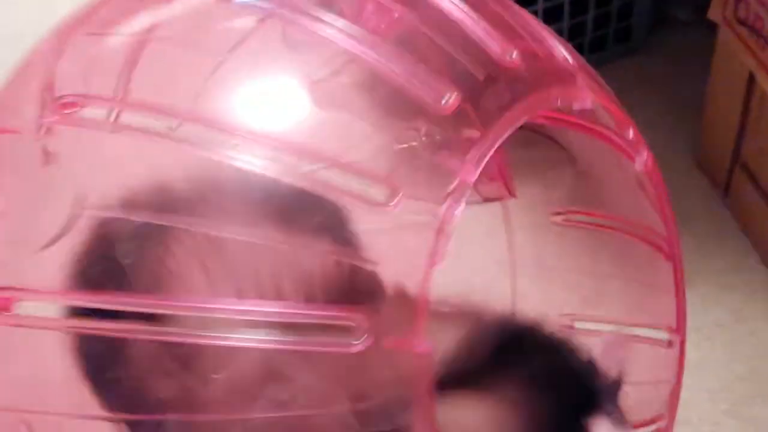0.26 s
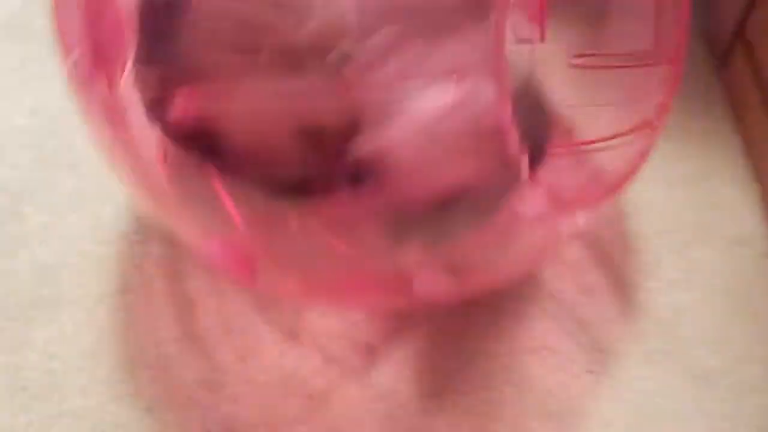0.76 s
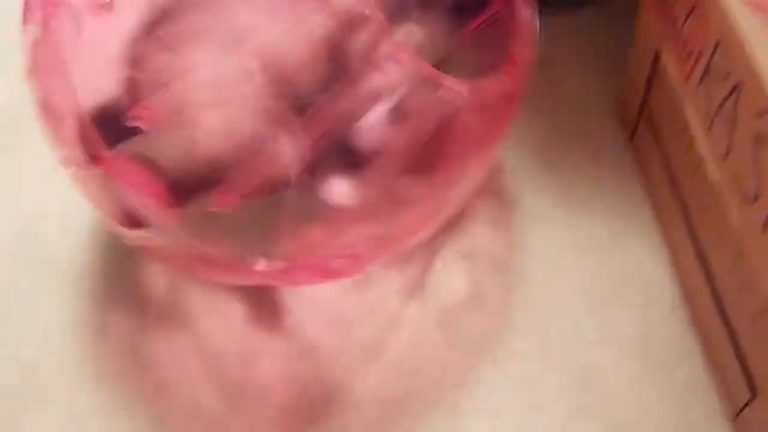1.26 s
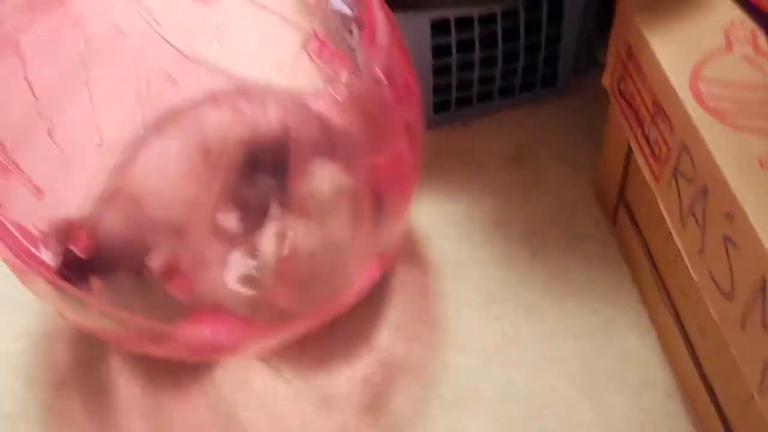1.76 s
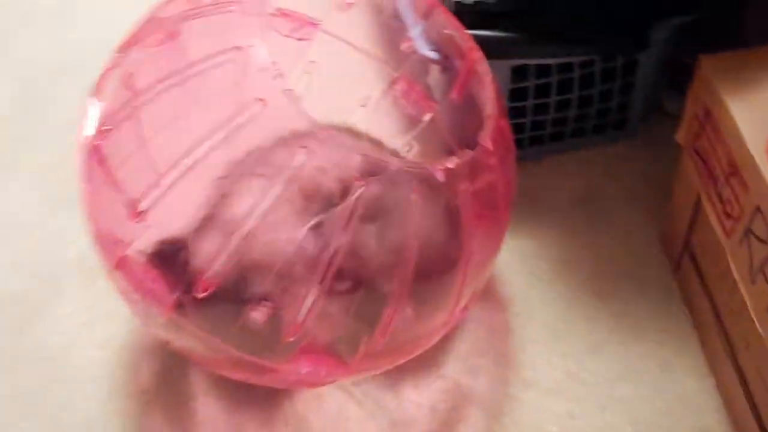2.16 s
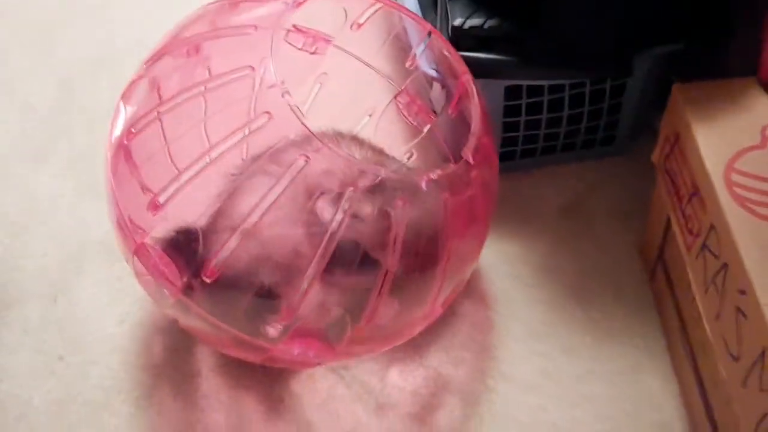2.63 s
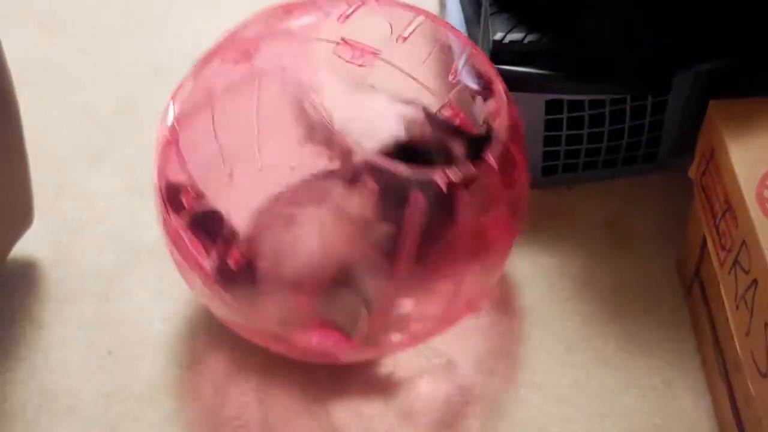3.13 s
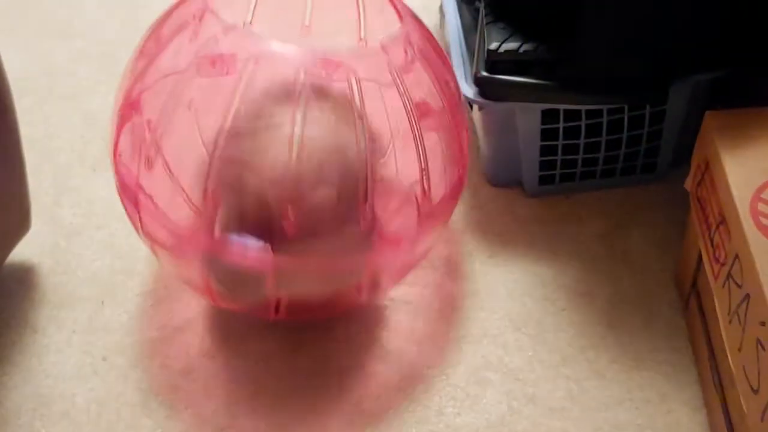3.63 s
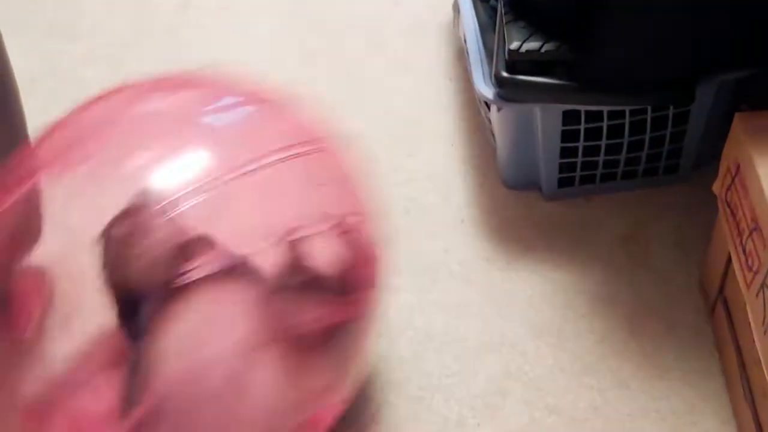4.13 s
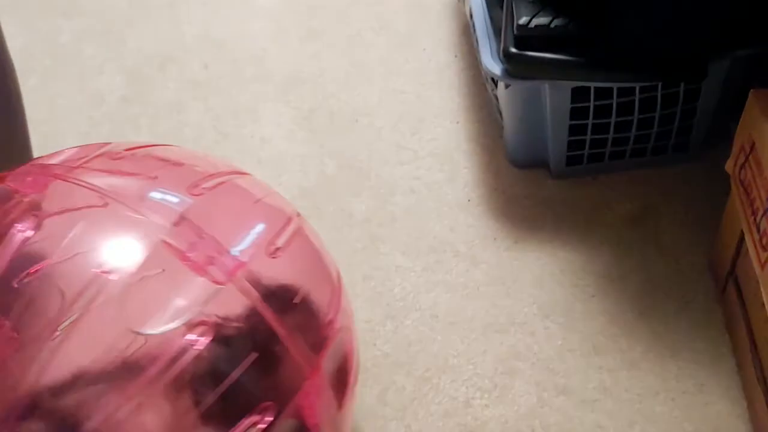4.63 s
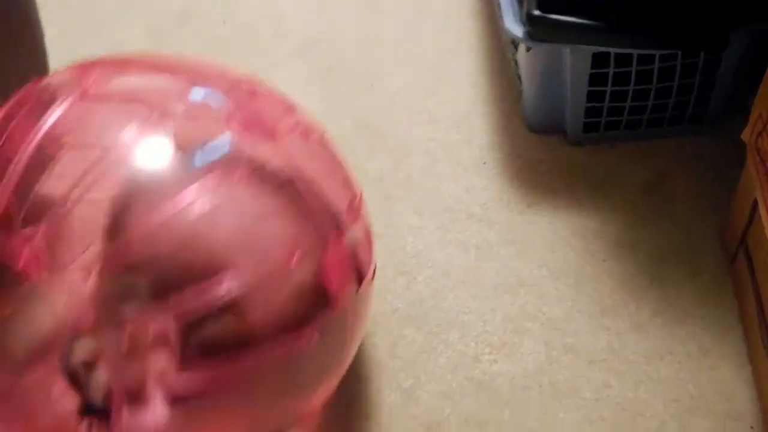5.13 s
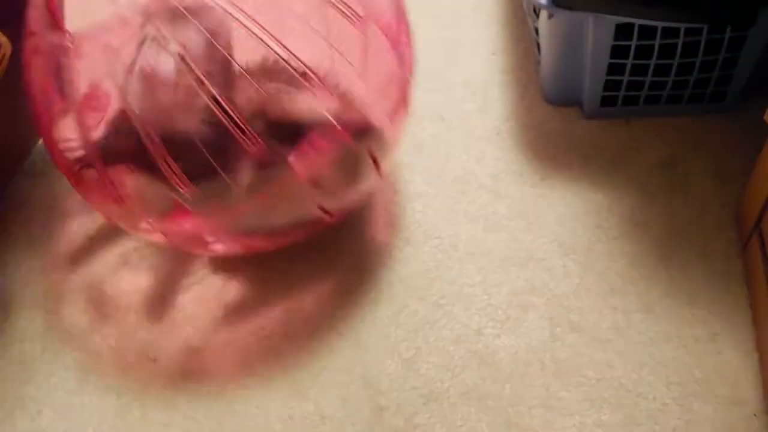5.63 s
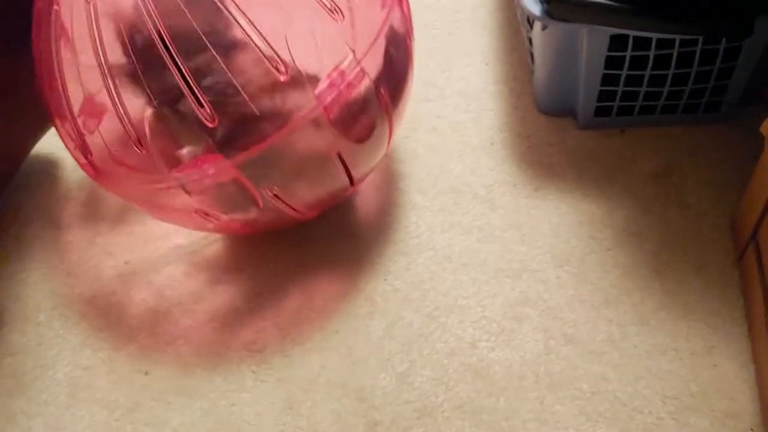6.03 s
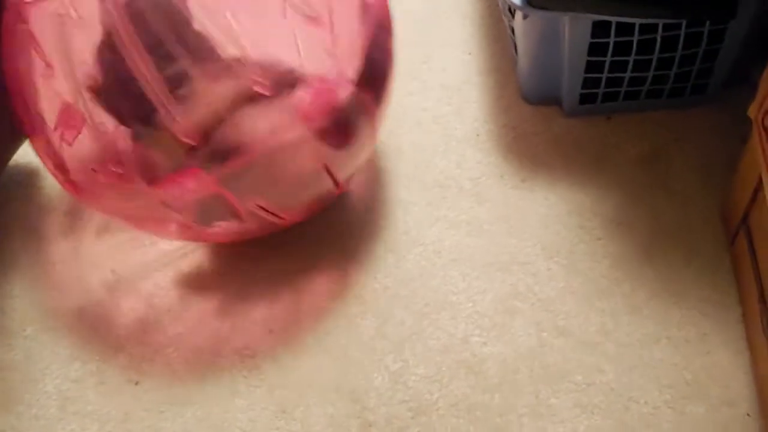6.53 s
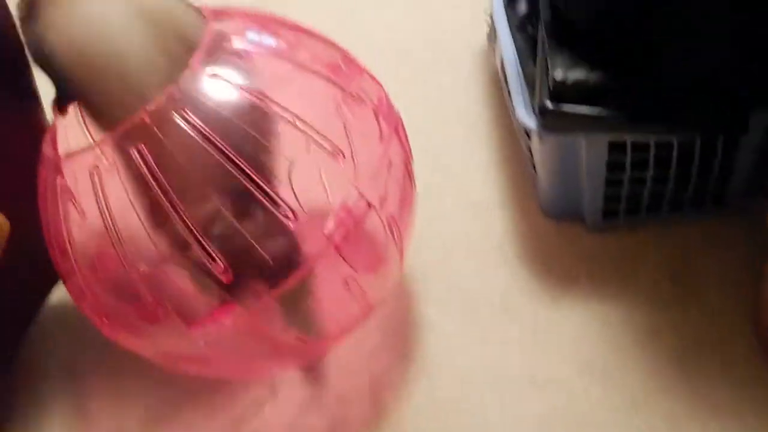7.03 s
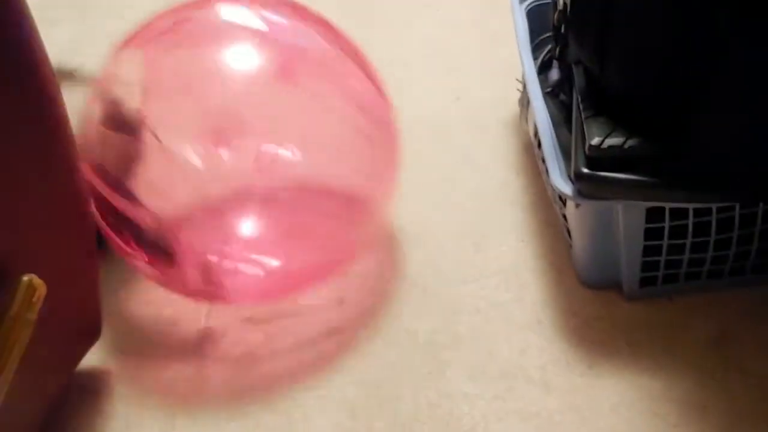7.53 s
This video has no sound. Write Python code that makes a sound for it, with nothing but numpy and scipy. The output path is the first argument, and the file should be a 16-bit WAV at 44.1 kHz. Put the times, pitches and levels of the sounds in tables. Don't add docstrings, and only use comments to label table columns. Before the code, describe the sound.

A small animal scrabbles inside a hollow plastic ball on carpet, heard close on a phone in a small furnished room. Claw ticks and scrapes come in quick runs, then a hard knock just after one second. A quieter stretch holds rustling and a faint sniff; an even heavier clatter lands past four seconds. More scratching, a tiny squeak and scattered knocks follow, over low fan hum.

```python
import sys
import numpy as np
from scipy import signal
from scipy.fft import rfft, irfft, next_fast_len
from scipy.io import wavfile
from scipy.ndimage import uniform_filter1d

SR = 44100
rng = np.random.default_rng(int(sys.argv[2]) if len(sys.argv) > 2 else 0)


def transcribe(signal):
    frames = np.atleast_2d(signal).T
    limited = np.clip(frames, -1, 1)
    pcm = np.round(limited * 32767).astype(np.int16)
    wavfile.write(sys.argv[1], SR, pcm)


def rack_gain(trim_db):
    fader = np.asarray(trim_db, float)
    return 10 ** (fader / 20)


N = 342965


def noise():
    return rng.standard_normal(N)


def unit(x):
    return x / np.sqrt(np.mean(x ** 2))


def band(x, lo_hz, hi_hz, order=2):
    return signal.sosfilt(signal.butter(order, [lo_hz, hi_hz], "band", fs=SR, output="sos"), x)


def walk(rate):
    hold = int(SR / rate)
    levels = np.repeat(rng.standard_normal(N // hold + 1), hold)
    return 1.514 * uniform_filter1d(uniform_filter1d(levels, hold), hold)[:N]


def curve(table):
    s, value = np.transpose(table)
    return np.interp(np.arange(N) / SR, s, value)


def add(out, x, s):
    i = int(s * SR)
    out[i:i + len(x)] += x[:N - i]


def decay(t, t60):
    return np.exp(-np.log(1000) * t / t60)


def ring(push, hz, gain, t60):
    t = np.arange(len(push)) / SR
    waves = np.sin(2 * np.pi * hz[:, None] * t) * decay(t, t60[:, None])
    y = signal.fftconvolve(push, (gain / np.sqrt(t60)) @ waves)[:len(push)]
    return y / np.abs(y).max()


def crowd(response, count):
    hz, db = np.transpose(response)
    place = (np.arange(count) + rng.random(count)) / count
    spread = hz[0] + (hz[-1] - hz[0]) * place
    return spread, rack_gain(np.interp(spread, hz, db)) * (-1) ** np.arange(count)


def room_hiss():
    # frequency in Hz, level in dB per Hz.
    room = [(15, -46.5), (25, -21), (64, -8.5), (133, -7.5), (162, -13), (232, -12.5), (262, -9.5),
            (360, -12), (426, -17), (726, -20.5), (1430, -24.5), (1700, -21), (2060, -23), (7090, -48.5),
            (8200, -46.5), (10700, -82.5), (18000, -120)]
    f = np.arange(N // 2 + 1) * SR / N + 1e-3
    hz, db = np.transpose(room)
    spectrum = rfft(noise()) * rack_gain(np.interp(np.log(f), np.log(hz), db))
    edges_hz = [0, 110, 220, 440, 880, 1760, 3520, SR]
    hiss = np.zeros(N)
    for lo, hi in zip(edges_hz, edges_hz[1:]):
        hiss += rack_gain(1.95 * walk(5)) * irfft(spectrum * (f >= lo) * (f < hi), N)
    return rack_gain(-46.5) * unit(hiss)


def fan_hum():
    # time in seconds, level in dB.
    hum = [(0, -59), (.5, -58.5), (1.2, -53.5), (1.7, -50), (2.6, -49), (3.0, -46), (3.7, -45.5),
           (4.1, -55.5), (4.5, -55.5), (4.8, -50.5), (5.9, -47), (6.1, -57), (6.55, -54), (6.8, -50.5),
           (7.3, -48.5), (7.78, -51.5)]
    hum_hz = 234.6 + 1.2 * walk(8.1)
    level = np.sqrt(2) * rack_gain(curve(hum) + 1.3 * walk(12))
    return level * np.sin(2 * np.pi * np.cumsum(hum_hz) / SR)


def echo(x):
    t = np.arange(int(.3 * SR)) / SR
    tail = band(rng.standard_normal(len(t)), 180, 3500, order=1) * decay(t, 0.11) * (t > .004)
    return rack_gain(-17.5) * signal.fftconvolve(x, tail / np.sqrt(np.sum(tail ** 2)))[:N]


def rustle():
    # time in seconds, effort in dB.
    effort = [(0, -0.5), (.2, -1), (.7, 2), (.86, -2.5), (1.19, 2.5), (1.5, -2.5), (2.4, 0.5), (2.75, 1.5),
              (3.05, 0.5), (3.6, 3.5), (3.9, 4), (4.3, -1), (5.02, 0), (5.87, 0), (6.11, 3.5), (6.37, 0.5),
              (6.73, 2.5), (7.45, 1)]
    effort_db = curve(effort)
    fur_db, scuff_db = -46.5 + 0.51 * effort_db, -52.5 + effort_db
    fur_floor_db, scuff_floor_db = -50.0, -55
    hit = rng.random(N) < 900 / SR
    hit_db = np.minimum(3 * rng.exponential(size=N), 9)
    grains = noise() * (1 + 0.62 * hit * rack_gain(hit_db)) * rack_gain(1.2 * walk(40))
    fur = band(grains, 740, 4090) + 0.46 * band(grains, 1750, 2370) + 0.65 * band(grains, 925, 1196)
    scuff = band(grains, 2100, 13750) + 0.43 * band(grains, 6480, 6890)

    def above(db, floor_db):
        return np.sqrt(np.maximum(rack_gain(2 * db) - rack_gain(2 * floor_db), 0))

    return above(fur_db, fur_floor_db) * unit(fur) + above(scuff_db, scuff_floor_db) * unit(scuff)


def whistles():
    # start in seconds, length in seconds, centre in Hz, width in Hz, level in dB.
    breaths = [
        (2.978, 0.085, 4040, 530, -42.5),
        (3.115, 0.026, 6950, 600, -49.5),
        (2.982, 0.061, 7100, 900, -47.5),
        (5.971, 0.031, 1180, 100, -29),
        (6.019, 0.016, 1380, 180, -36),
    ]
    out = np.zeros(N)
    for s, length, hz, width_hz, db in breaths:
        k = int(length * SR)
        hiss = band(rng.standard_normal(SR // 4), hz - width_hz / 2, hz + width_hz / 2)[-k:]
        add(out, rack_gain(db) * unit(hiss) * np.sin(np.linspace(0, np.pi, k)), s)
    return out


def rasps():
    # start in seconds, length in seconds, level in dB.
    drags = [(0.149, 0.1, -40.5), (0.603, 0.084, -46), (0.809, .075, -38), (1.034, 0.023, -40.5),
             (2.923, 0.11, -51), (3.205, 0.055, -48), (3.995, 0.026, -40.5), (4.218, 0.085, -44),
             (4.955, 0.093, -46), (5.997, .07, -49), (6.066, 0.144, -38.5), (0.663, 0.13, -57),
             (1.236, 0.048, -39), (4.17, .03, -35), (4.42, 0.057, -47.5), (6.31, 0.11, -41.5)]
    grit = (rng.random(N) < 4000 / SR) * noise() * rack_gain(2.2 * walk(150))
    grit = unit(band(grit, 1700, 5900, order=1) + 0.16 * band(grit, 5800, 7800))
    level = np.zeros(N)
    for s, length, db in drags:
        add(level, rack_gain(db) * np.sin(np.linspace(0, np.pi, int(length * SR))) ** .5, s)
    return grit * level


def bumps():
    # start in seconds, peak in dB, pitch in Hz, 60 dB decay in seconds.
    thuds = [(1.236, -16.5, 81, 0.14), (1.254, -28, 136, 0.098), (4.168, -29, 69.4, 0.12),
             (4.186, -15, 210, 0.054), (4.202, -16.5, 159.4, 0.16), (4.212, -26, 130, 0.08),
             (4.289, -28.5, 127, 0.17), (4.329, -35, 102, 0.32), (3.8, -29, 172, 0.097),
             (4.235, -35, 200, 0.06), (4.35, -31.5, 170, 0.13), (1.262, -32, 70, .1),
             (3.801, -22, 276, 0.091), (4.48, -38, 142, 0.35), (7.735, -35.5, 306, 0.097),
             (7.752, -29.5, 199, 0.13), (0.3, -27, 285, 0.04), (.302, -16, 750, 0.035),
             (.618, -33.5, 836, 0.055), (1.239, -23, 436, 0.076), (1.236, -18.5, 612, 0.044),
             (2.732, -31.5, 287, 0.11), (3.797, -20, 620, 0.047), (4.163, -17, 292, 0.061),
             (4.484, -40, 513, 0.067), (4.720, -23.5, 543, 0.029), (6.808, -23, 275.4, 0.17),
             (7.462, -27.5, 770, 0.03)]
    out, t = np.zeros(N), np.arange(int(.3 * SR)) / SR
    for s, db, hz, t60 in thuds:
        phase = 2 * np.pi * (hz * t + .5 * (1 - np.exp(-t / 0.02)))
        onset = 1 - np.exp(-t * hz / 0.31)
        add(out, rack_gain(db) * np.sin(phase) * onset * decay(t, t60), s)
    return out


def skid(skid_ms):
    t = np.arange(int(.06 * SR)) / SR
    hit = rng.random(len(t)) < 5000 / SR
    sign = np.sign(rng.random(len(t)) - .5)
    impacts = hit * sign * rack_gain(-3 * np.log(rng.random(len(t)) + 1e-9))
    impacts[0] = 4.4
    return impacts * np.exp(-t / (skid_ms / 1000))


def shell_ring(push, hz, treble_db, lone):
    # frequency in Hz, level in dB.
    shell = [(500, -10), (800, -11), (1100, -2.5), (1500, -3), (2000, 0.5), (2800, 0), (3600, 5),
             (4600, -1)]
    wall_hz, wall = crowd(shell, 26)
    octaves = np.log2(wall_hz / hz)
    off_pitch = np.log(wall_hz / hz)
    wall = wall * (.6 + 1 / (1 + (off_pitch / .18) ** 2)) * rack_gain(3.0 * rng.random(26))
    wall = wall * rack_gain(0.34 * min(treble_db + 1.5, 0) * np.maximum(octaves, 0))
    if lone:
        wall = np.abs(wall) * (.25 + 1 / (1 + (off_pitch / .22) ** 2))
    return ring(push, wall_hz, wall, 0.022 * (1000 / wall_hz) ** 0.69)


def tick_ring(push):
    # frequency in Hz, level in dB.
    tick_response = [(4300, -1), (5000, -4), (6000, -3), (7050, 3.5), (7600, -3), (8300, -0.5)]
    rib_hz, rib = crowd(tick_response, 14)
    return ring(push, rib_hz, rib, np.full(14, 0.0086))


def air_boom():
    # frequency in Hz, level in dB, 60 dB decay in seconds.
    hollow = [(232, -19, 0.049), (291.4, 5.5, 0.12), (371, 2.5, 0.11), (433, -11.5, 0.047),
              (504.5, 0.5, 0.042), (670, -6, 0.061), (810, -11, 0.075)]
    hz, db, t60 = np.transpose(hollow)
    shove = np.exp(-((np.arange(4400) / SR - .001) / 0.00031) ** 2)
    detune = 1 + 0.1 * (rng.random(len(hz)) - .5)
    return ring(shove, hz * detune, rack_gain(db + 2 * rng.random(len(hz))), t60)


def contacts():
    # start in seconds, peak in dB, loudest shell pitch in Hz, treble in dB re peak.
    taps = [(.219, -28.5, 2290, -8), (.289, -20, 2700, -12), (.302, -12.5, 910, -24),
            (.341, -20, 2670, -14), (.687, -27, 3500, -12), (.843, -21, 2020, -10), (.922, -26.5, 716, -14),
            (1.232, -10.5, 1000, -16.5), (2.73, -17, 1400, -9), (2.814, -33.5, 3660, -7),
            (3.638, -29.5, 910, -3), (3.89, -20.5, 2840, -3), (3.895, -22.5, 2760, -6),
            (4.033, -26, 1700, -6), (4.062, -21.5, 1200, -9.5), (4.162, -5, 1050, -15),
            (4.194, -15.5, 1850, -17), (4.63, -33.5, 1920, 2.5), (5.924, -29.5, 1300, -1),
            (6.024, -38, 1170, -7), (6.088, -28.5, 3030, 1.5), (6.121, -30, 2750, -2),
            (6.136, -26, 1290, -9), (6.462, -35.5, 4000, -4), (.399, -38, 3000, -6),
            (6.637, -33.5, 3730, -3), (6.807, -13.5, 1194, -12.5), (6.821, -20, 4050, -6),
            (6.859, -21, 4200, -3.5), (6.911, -20, 2850, -7)]
    skids = [(.817, -32.5, 2000, -7), (.673, -29, 3040, -3.5), (.722, -31, 1500, -7),
             (.854, -19, 3900, -7.5), (.866, -30, 3620, -7), (.887, -31, 3000, -5), (1.048, -33, 2510, 0),
             (1.253, -19, 2300, -18), (4.073, -37, 1070, -7), (3.843, -21, 1620, -15),
             (3.931, -33.5, 1840, -1), (4.007, -18, 1380, -12.5), (4.019, -19, 2470, -10),
             (4.304, -28, 2000, -14.5), (4.445, -34, 2000, -3), (5.388, -24, 1130, -4.5),
             (5.417, -23.5, 4340, -4.5), (6.008, -35.5, 2920, 8), (6.042, -29, 3950, 0),
             (6.073, -29, 1340, -8), (6.096, -25.5, 1290, -4), (6.111, -30, 4090, 1),
             (6.145, -22.5, 1280, -4), (6.158, -32, 2400, -3), (6.177, -20, 1600, -3),
             (6.194, -36, 3560, 6), (6.31, -33.5, 2340, 4.5), (6.319, -27, 3060, -5),
             (6.365, -26, 2350, -9), (6.409, -23, 686, -4)]
    steps = [(.165, -28, 2960, -19), (.618, -28, 840, -20), (.625, -25.5, 920, -17), (1.236, -7, 720, -17),
             (1.358, -42, 2330, -22), (3.693, -26, 3580, -4), (3.756, -37, 2850, 8),
             (3.794, -13.5, 1090, -9.5), (4.168, -8.5, 1900, -19), (4.25, -21.5, 1880, -12),
             (4.31, -30, 2480, -2), (4.343, -18, 2100, -15), (4.37, -30, 1190, -27),
             (4.483, -25.5, 1070, -36), (4.703, -32.5, 1950, -42), (4.72, -21, 1120, -17.5),
             (4.965, -33.5, 1820, -7), (4.984, -22, 2000, -14), (4.999, -19.5, 2010, -6),
             (6.355, -30, 2490, -4), (2.965, -33.5, 4150, 1), (4.128, -38, 2340, -8), (4.477, -42, 3000, 3),
             (1.519, -42, 1880, -21), (2.572, -32, 1080, -13), (5.433, -39, 3000, 0),
             (4.455, -36, 3040, -3)]
    slides = [(.257, -25, 2980, -8), (1.241, -9, 2000, -17), (1.266, -26, 3800, -14), (1.28, -30, 764, -32),
              (1.317, -36, 1300, -20), (2.926, -40, 3710, 6), (3.061, -36, 1100, -33), (3.2, -24, 1520, -5),
              (3.215, -24.5, 1670, -12), (3.229, -31, 2100, -14), (3.379, -30.5, 1180, -28),
              (3.499, -33.5, 1700, -2), (3.8, -14, 1210, -22), (4.182, -14, 1300, -9),
              (4.203, -21.5, 1500, -21), (4.275, -27, 1890, -20), (4.286, -22, 2460, -15),
              (5.029, -33, 1960, -12), (6.382, -30, 1260, -15), (7.029, -34.5, 1680, -3.5),
              (7.461, -21, 1060, -33), (7.452, -34, 2500, -22)]
    flicks = [(.166, -33, 2900, -10), (.2955, -22, 2400, -19), (.3033, -19, 2500, -21),
              (.3055, -14.5, 1010, -27), (.3095, -17.5, 900, -25), (.3393, -20, 4000, -2.5),
              (.346, -29, 2600, -10), (.812, -30, 4000, -5), (.835, -25, 1500, -4), (.8445, -25, 1950, -7),
              (.8475, -27, 1950, -10), (.8568, -16.5, 2200, -5), (.8648, -19, 2300, -6),
              (.8695, -26, 2000, -3), (.875, -23, 2500, -3), (1.2323, -12.5, 2500, -8),
              (1.2338, -2.5, 1250, -19), (1.235, -5, 1000, -14), (1.238, -7, 950, -21),
              (1.2445, -14, 1700, -15), (1.2511, -3, 1350, -28), (1.2547, -5, 1800, -22),
              (1.2595, -18, 1300, -15), (3.7945, -11.5, 2480, -6.5), (3.8425, -18.5, 2600, -9),
              (4.1607, -10.5, 2000, -7), (4.1643, -6.5, 1100, -17), (4.1658, -8.5, 1900, -17),
              (4.1708, -2.5, 2800, -18), (4.1745, -8, 1700, -13), (4.1848, -8, 1800, -16),
              (4.1965, -18.5, 1900, -11), (4.2545, -24, 1900, -9), (4.2955, -30, 1500, -7),
              (4.304, -25, 2000, -10), (5.3875, -28, 2000, -3), (6.081, -32, 1100, -9),
              (6.0945, -25, 3000, -1.5), (6.1455, -28, 2000, -4), (6.1655, -27, 1200, -6),
              (6.172, -27, 2000, 0), (6.1755, -11.5, 3000, -12), (6.179, -18.5, 3400, -12),
              (6.211, -32, 3000, 0), (6.221, -34, 3000, -2), (6.3275, -31, 1300, -2),
              (6.343, -31, 2300, -2), (6.373, -30, 1300, -6), (6.381, -29, 3800, -8),
              (6.4175, -30, 1100, -6)]
    # its rows, air boom in dB re peak, skid length in ms
    kinds = [(taps, -23, 3), (skids, -28, 6.4), (steps, -9.5, 2.7), (slides, -7, 9.3), (flicks, -25.5, 0.5)]
    out = np.zeros(N)
    for rows, boom_db, skid_ms in kinds:
        for s, db, hz, treble_db in rows:
            push = skid(skid_ms)
            y = shell_ring(push, hz, treble_db, lone=skid_ms < 1.2)
            y += rack_gain(treble_db + 1.5) * tick_ring(push)
            add(out, rack_gain(db) * y, s)
            hollow_db = boom_db - 0.2 * (db + 27)
            add(out, rack_gain(db + hollow_db + 3.5) * air_boom(), s)
    return out


def scene():
    ball = contacts() + bumps() + whistles() + rustle() + rasps()
    mid = ball + echo(ball) + room_hiss() + fan_hum()
    uneven = band(mid, 1000, 8300) + .6 * band(mid, 5500, 8300) + 0.52 * band(mid, 380, 560)
    skew = np.imag(signal.hilbert(uneven, next_fast_len(N))[:N])
    side = -.26 * band(mid, 1100, 2800, order=1) + 0.18 * walk(72) * skew
    return np.array([mid + side, mid - side])


def thrift(x):
    # frequency in Hz, share of frames that keep left-right difference, share of frames emptied.
    savings = [(253, .03, 0.00056), (454, 0.78, 0.0064), (790, 0.061, 0.0045), (1300, 0.3, 0.0077),
               (2000, .36, 0.016), (2580, .06, 0.0036), (4200, 0.026, 0.0089), (5800, 0.011, 0.043),
               (7900, .01, 0.032)]
    f, _, z = signal.stft(np.array([x[0] + x[1], x[0] - x[1]]) / 2, SR, nperseg=1024)
    hz, stereo, empty = np.transpose(savings)
    strip = (22 * np.log(1 + f / 700)).astype(int)
    dice = rng.random((2, strip.max() + 1, z.shape[2] // 4 + 1))
    dice = np.repeat(dice, 4, axis=2)[:, strip, :z.shape[2]]
    bright = np.sum(np.abs(z[0, f > 1500]) ** 2, axis=0)
    attack = bright > rack_gain(11) * np.roll(bright, 2)
    starved = 0.58 + 14 * np.roll(uniform_filter1d(1. * attack, size=4), 2)
    keep_stereo = dice[0] < np.interp(f, hz, stereo)[:, None]
    z[1] *= keep_stereo | (attack & (f[:, None] > 750) & (dice[1] < .7))
    z[:, f > 7750] *= bright > rack_gain(3.0) * np.median(bright)
    speckle = rng.random(z.shape[1:]) < .12
    z *= (dice[1] > np.interp(f, hz, empty)[:, None] * starved) | attack | speckle
    mid, side = signal.istft(z, SR, nperseg=1024)[1][:, :N]
    return np.array([mid + side, mid - side])


def starve(x):
    f, _, z = signal.stft(x, SR, nperseg=256)
    bright = np.sum(np.abs(z[:, f > 1500]) ** 2, axis=(0, 1))
    jump = 1. * (bright > rack_gain(16) * np.roll(bright, 4))
    near = uniform_filter1d(np.roll(jump, 3), size=15) > 1e-6
    strip = (f / 1100).astype(int)
    dice = rng.random((strip.max() + 1, z.shape[2] // 3 + 1))
    dice = np.repeat(dice, 3, axis=1)[strip, :z.shape[2]]
    quiet = bright < rack_gain(-8) * uniform_filter1d(bright, size=9)
    z *= 1 - 0.69 * ((dice < .45) & (f[:, None] > 4400) & near & quiet)
    return signal.istft(z, SR, nperseg=256)[1][:, :N]


def band_limit(x):
    return signal.sosfilt(signal.butter(12, 15700, fs=SR, output="sos"), x)


def record(dry):
    rounded = np.tanh(1.252 * dry) / 1.151
    low_pass = signal.ellip(8, .5, 85, 7627, fs=SR, output="sos")
    thinned = starve(thrift(signal.sosfilt(low_pass, rounded)))
    glitch = rack_gain(-33.5) * (np.arange(N) == int(4.3098 * SR))
    return band_limit(thinned + glitch)


dry = scene()
out = record(dry)
transcribe(out)
```